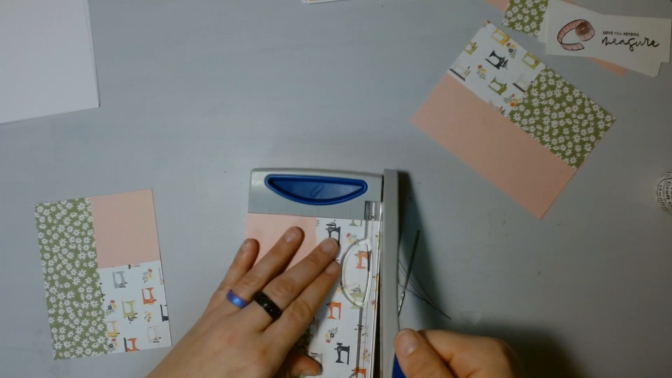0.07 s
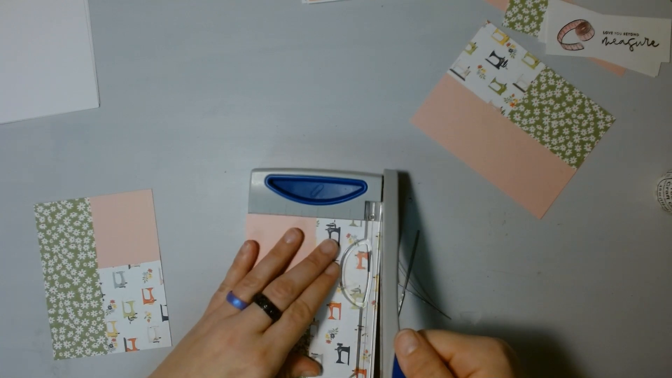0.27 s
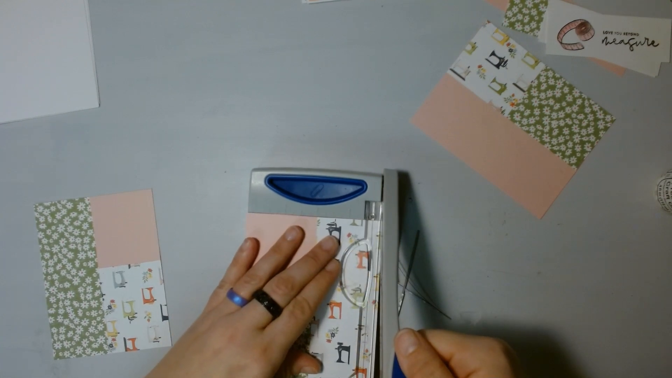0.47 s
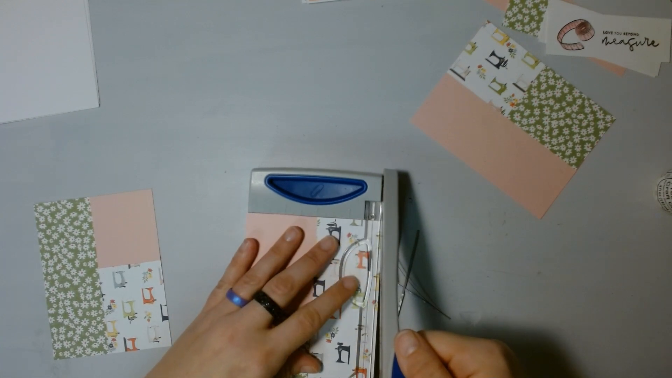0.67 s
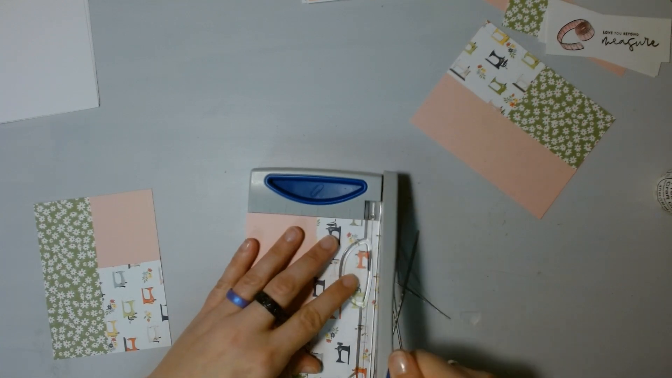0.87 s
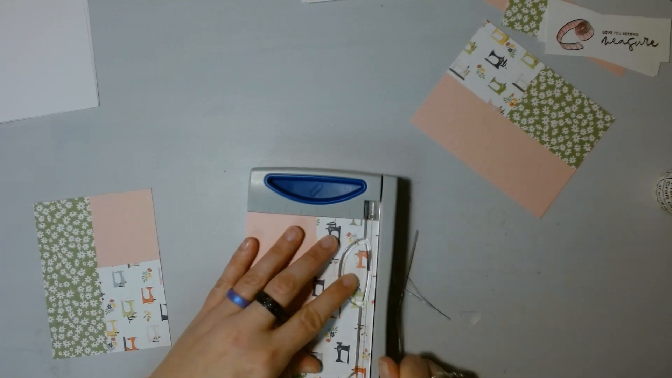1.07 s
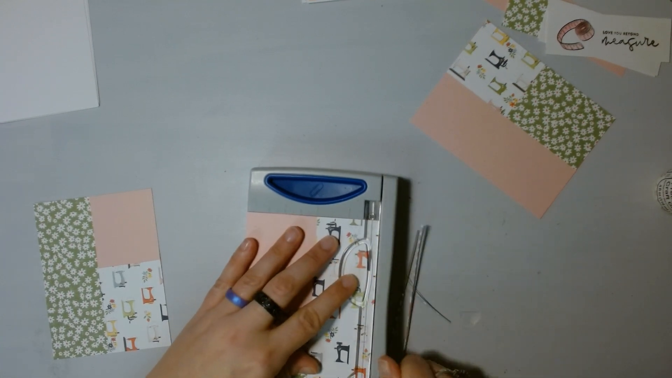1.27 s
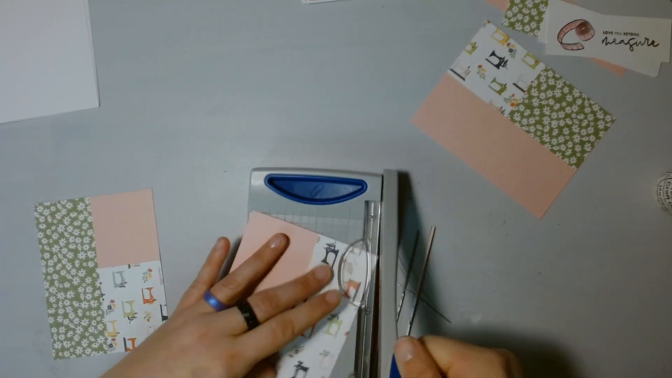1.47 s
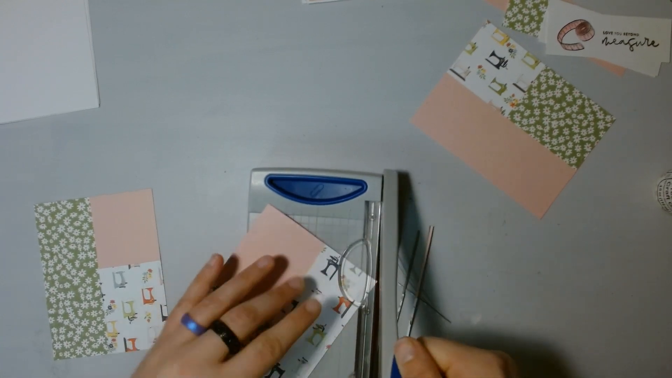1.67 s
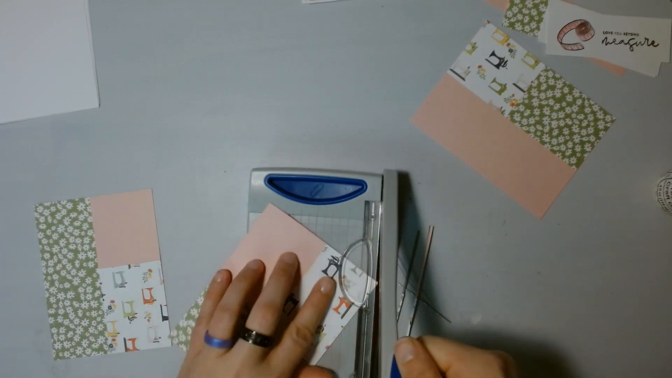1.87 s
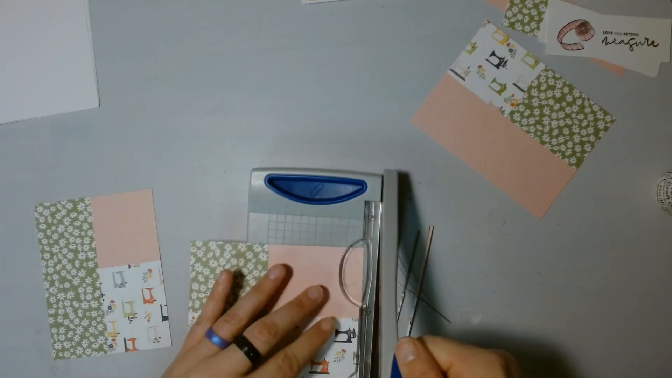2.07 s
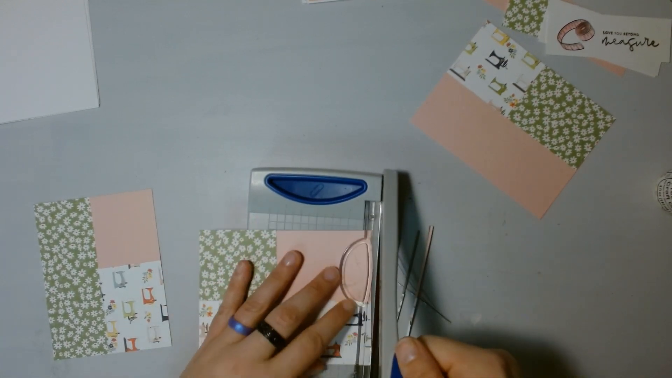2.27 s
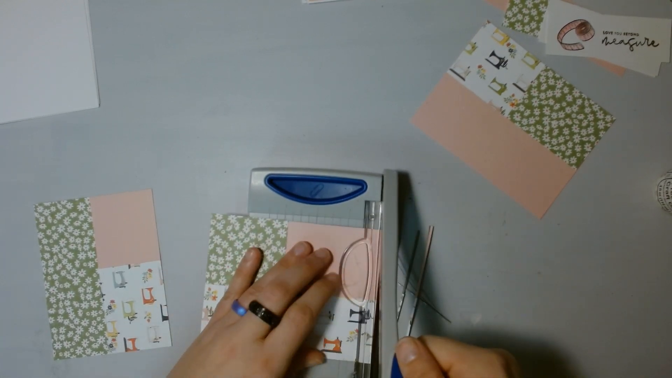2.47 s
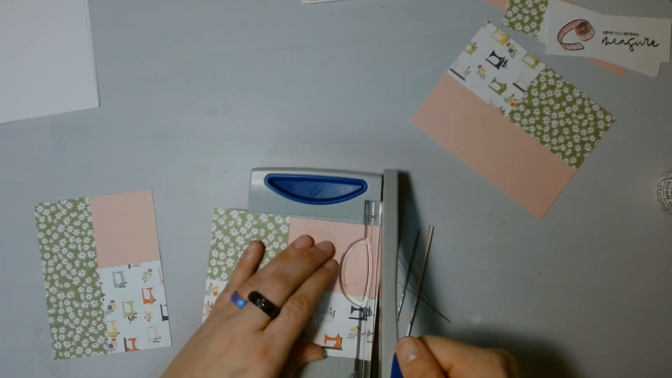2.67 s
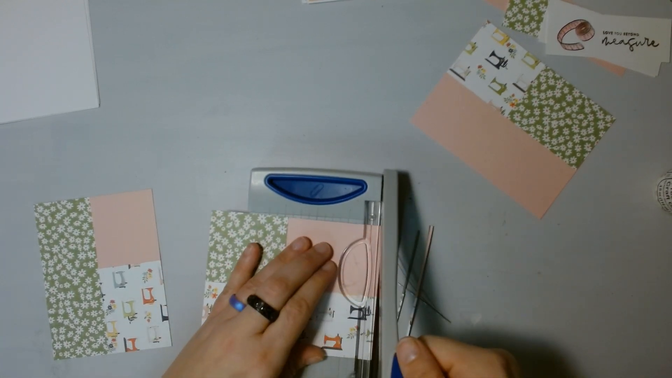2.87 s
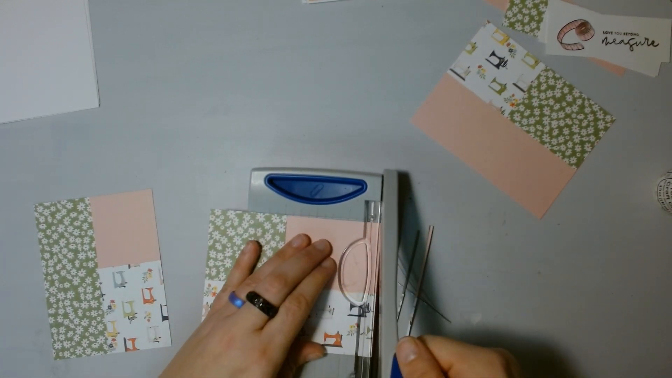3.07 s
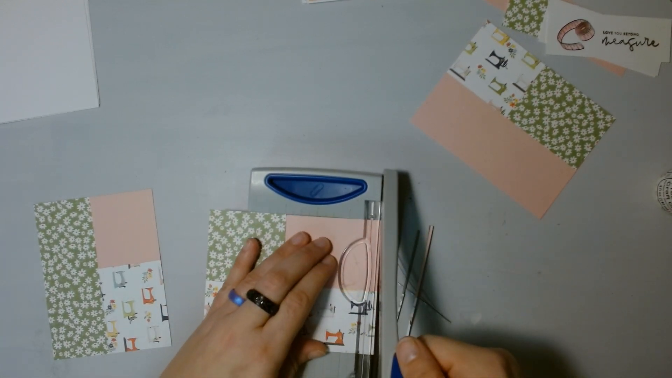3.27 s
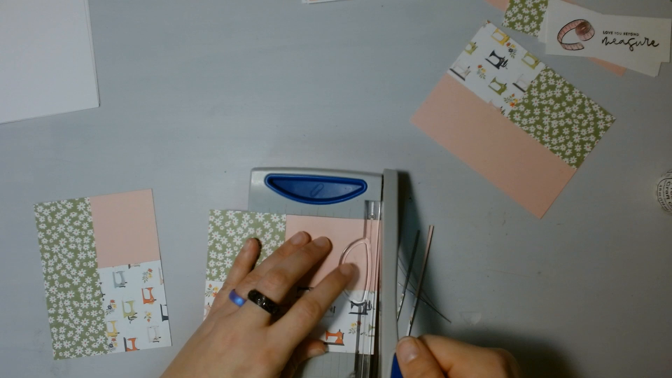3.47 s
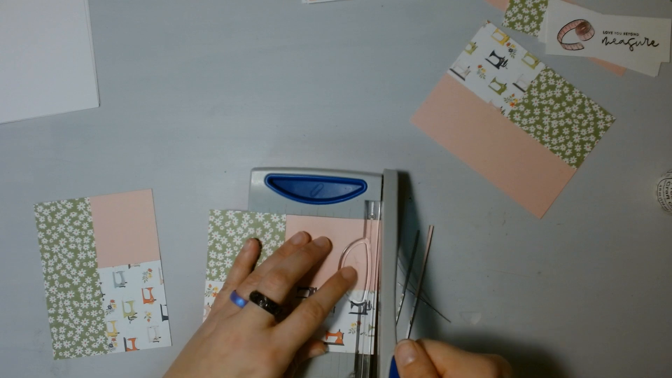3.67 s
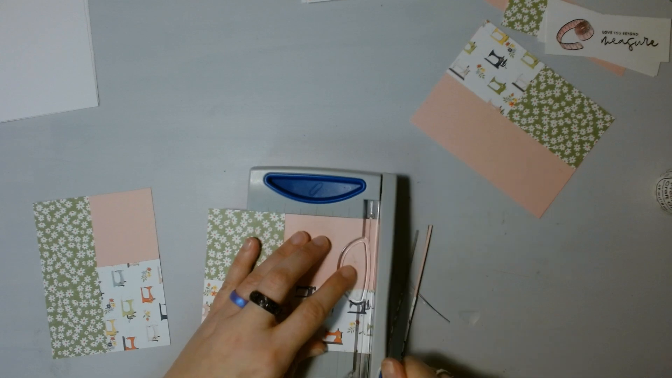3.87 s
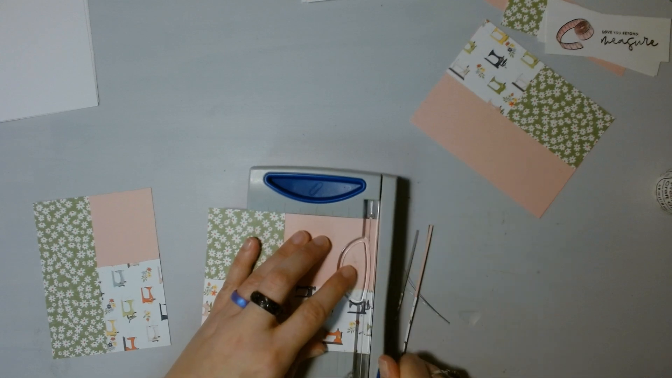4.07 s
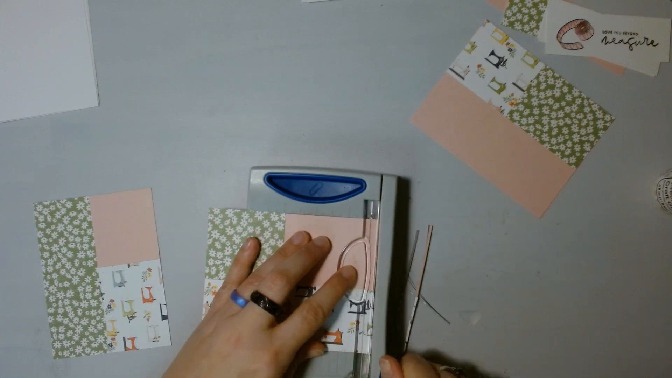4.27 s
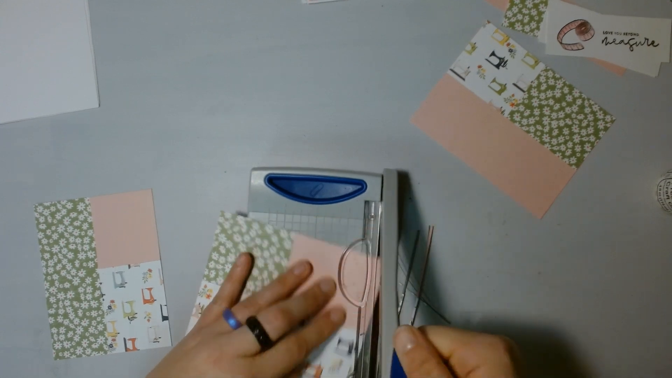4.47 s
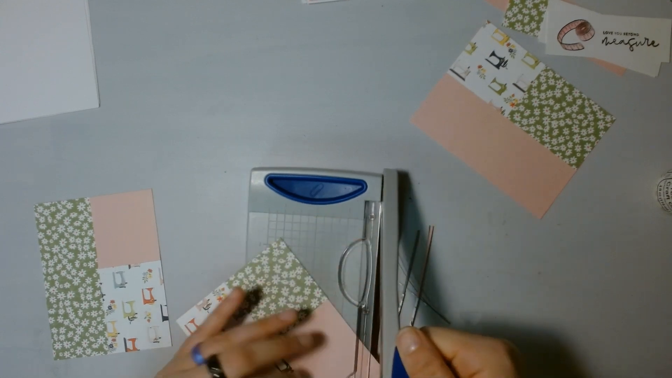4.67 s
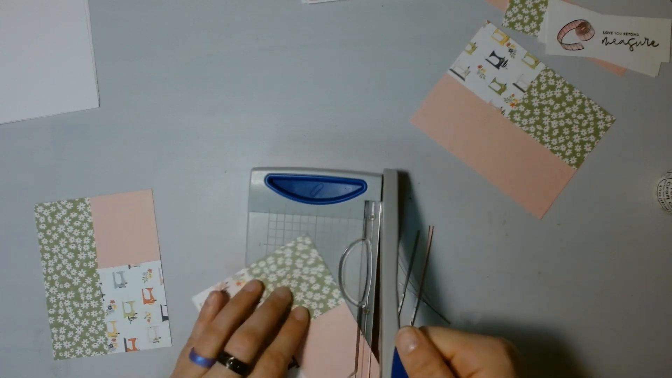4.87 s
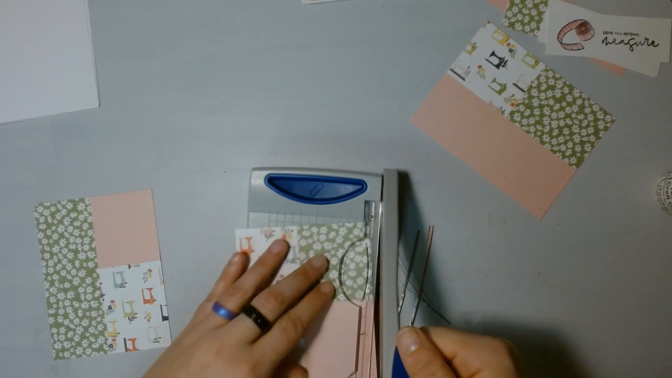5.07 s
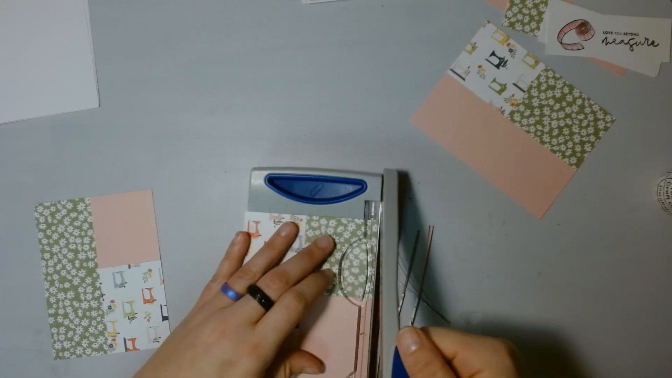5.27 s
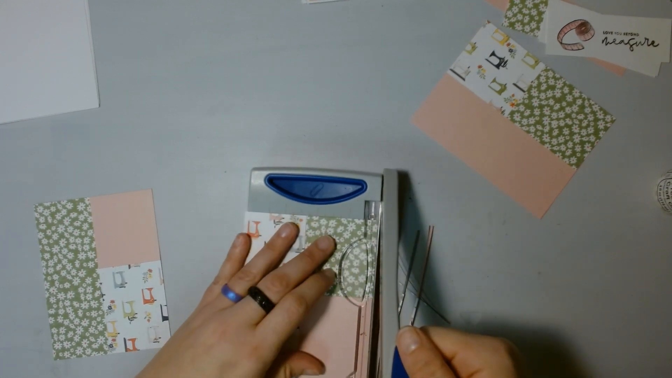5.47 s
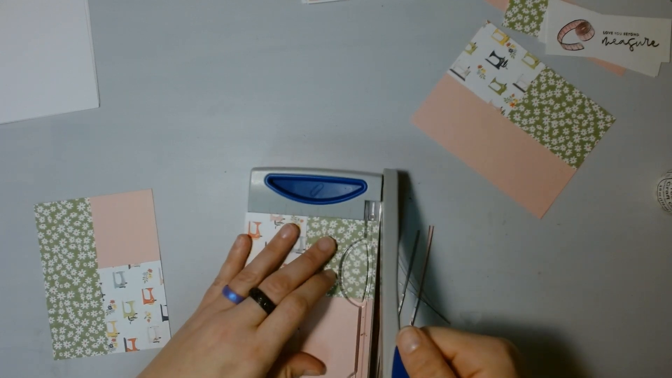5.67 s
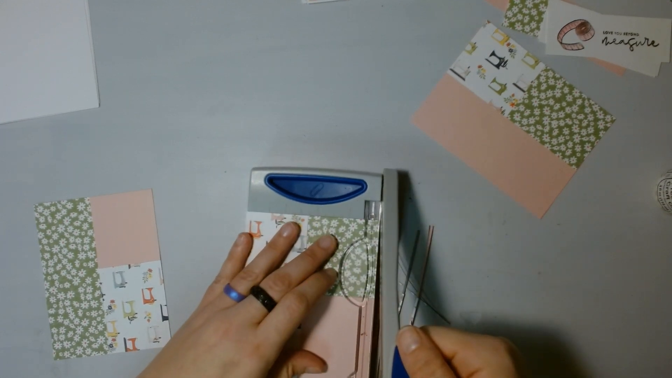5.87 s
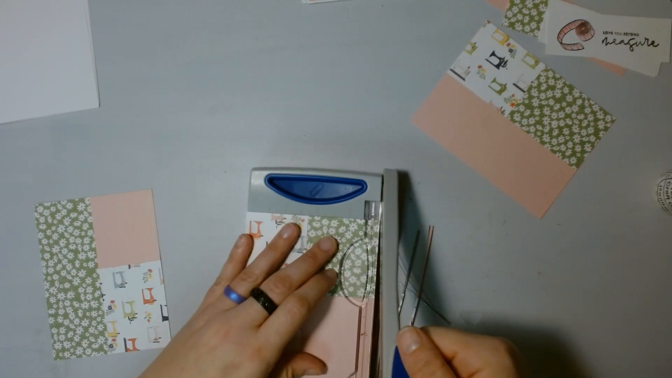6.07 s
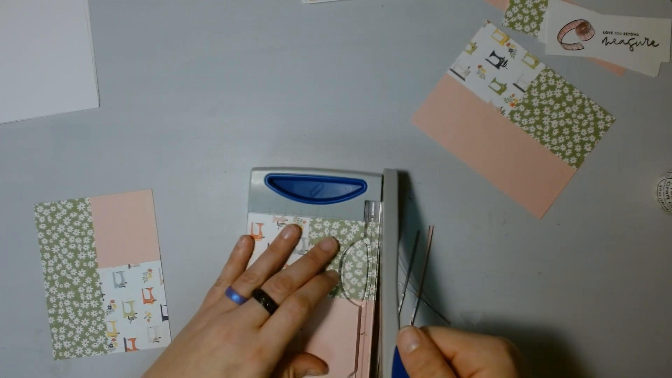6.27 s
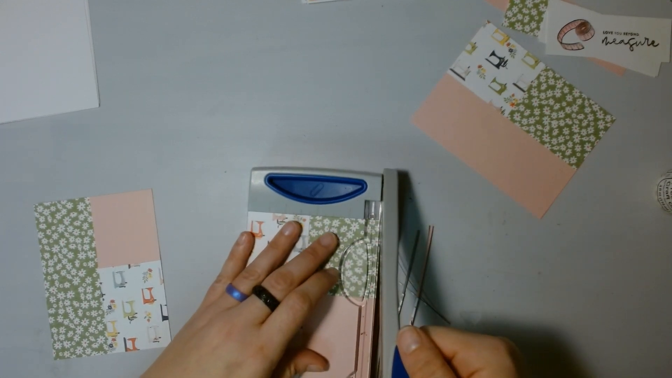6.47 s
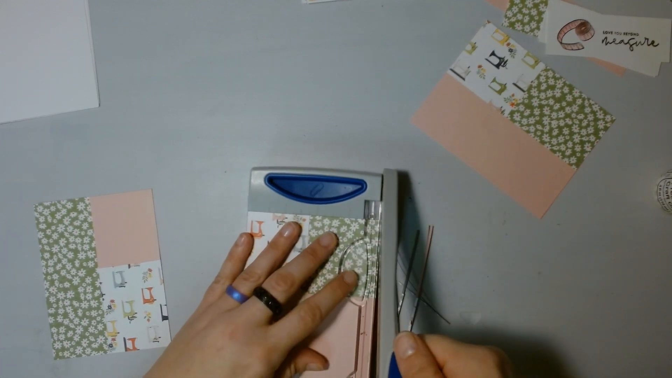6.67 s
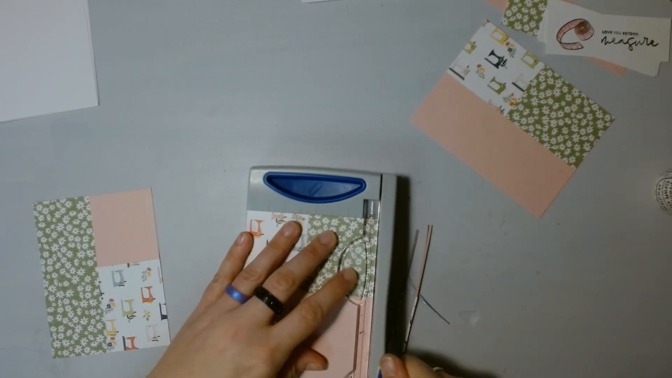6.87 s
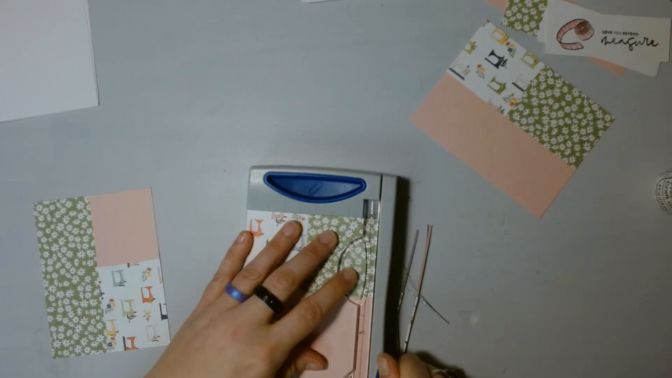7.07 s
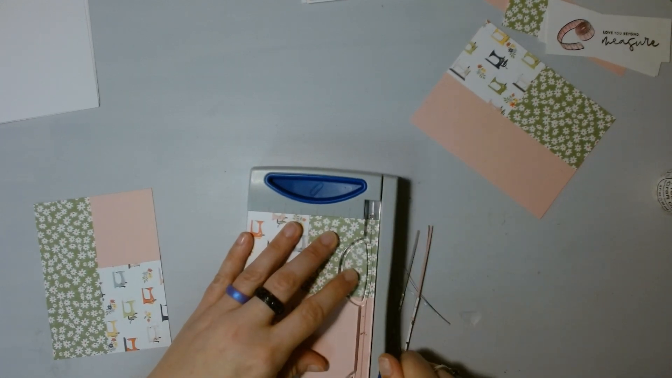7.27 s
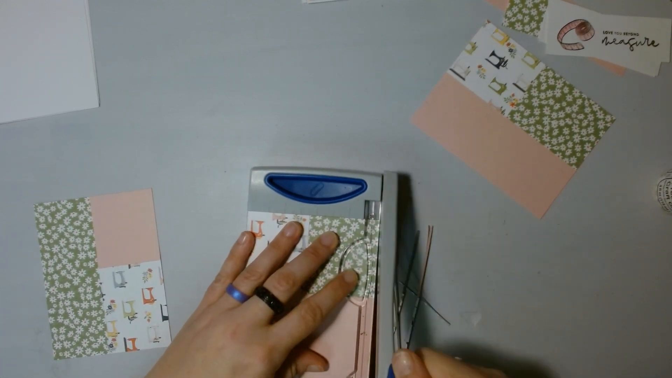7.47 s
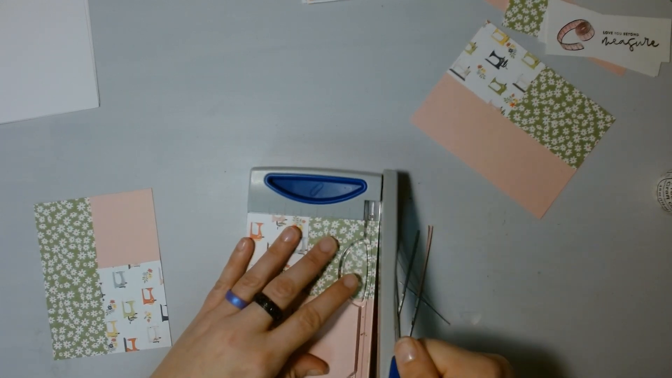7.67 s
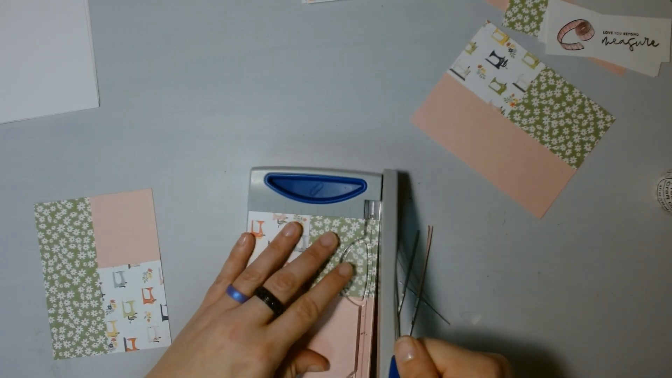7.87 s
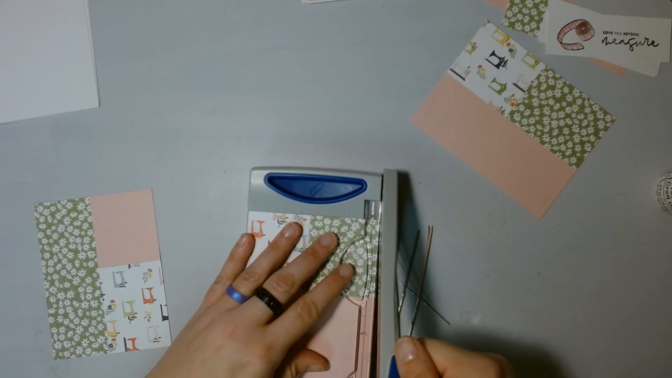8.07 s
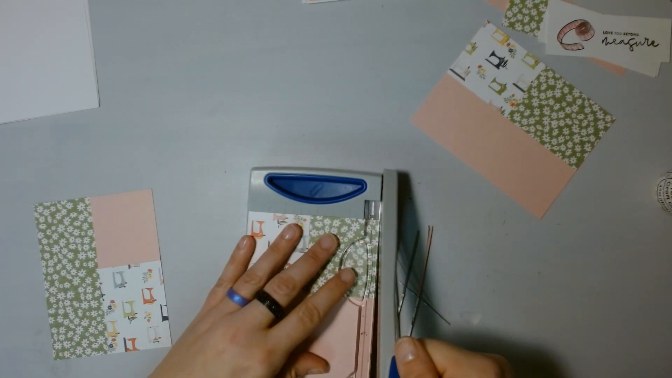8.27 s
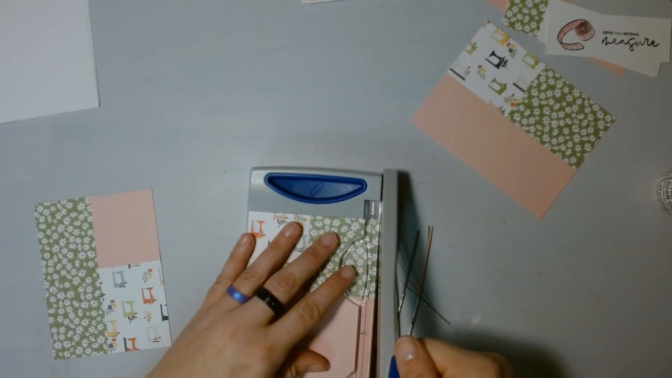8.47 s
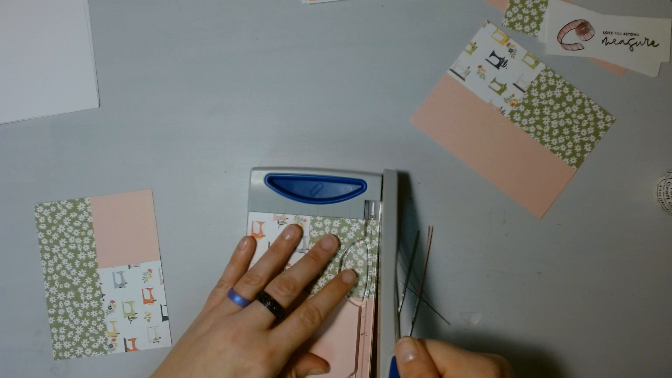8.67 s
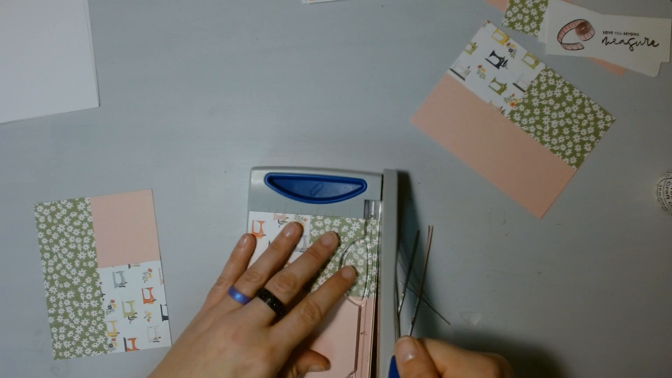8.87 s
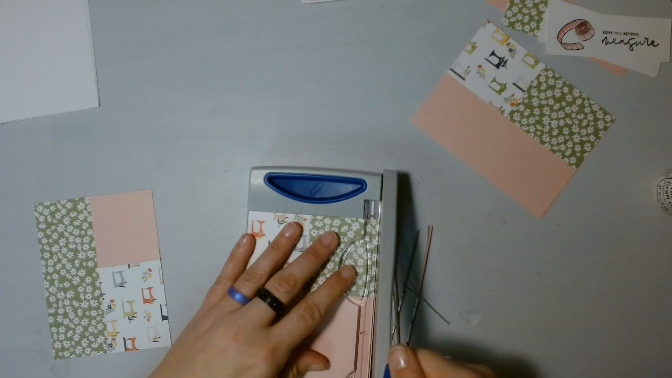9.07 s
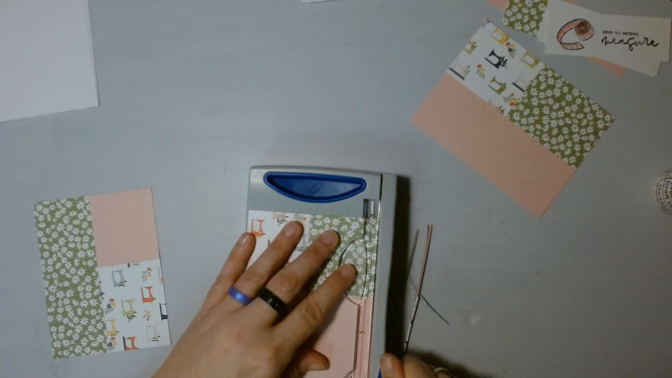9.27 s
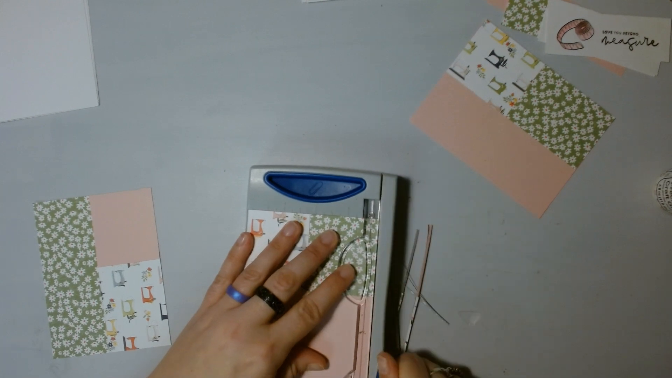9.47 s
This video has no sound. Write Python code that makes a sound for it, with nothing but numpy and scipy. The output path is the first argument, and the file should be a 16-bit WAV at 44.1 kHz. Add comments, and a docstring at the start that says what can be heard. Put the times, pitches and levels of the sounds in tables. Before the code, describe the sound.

A small paper guillotine on a table, heard close from overhead in a small damped room. Four gritty, crisp shearing strokes, about three seconds apart, each end in a loud clack with a low table thud and faint metallic ring. Between cuts, card hisses over plastic, turns, and its edges tick and bump softly. Quiet hum and hiss lie beneath, and the slams overload the mono microphone.

```python
"""A small guillotine trimmer cuts card four times: tearing-fibre noise drives steel, plastic and table modes,
stalls at times, and ends in a slam of noise and table thuds, with a faint ring of the blade's modes.
Between cuts a hand slides, turns and taps the card: swelling friction hiss, rung ticks and soft bumps.
A small damped room adds a decaying noise tail, over a quiet hum, rumble and hiss. The mono microphone
overhead clips on the slams."""
import sys
import numpy as np
from scipy import signal
from scipy.fft import rfft, irfft, next_fast_len
from scipy.io import wavfile
from scipy.ndimage import uniform_filter1d, map_coordinates

SR = 44100
rng = np.random.default_rng(int(sys.argv[2]) if len(sys.argv) > 2 else 0)


def transcribe(u):
    """Save the signal u as a 16-bit wav file named by the first command-line argument.

    u: samples, shape (n,) or (channels, n), limited to [-1, 1]; the rate is SR.
    q: integer samples, one column per channel.
    """
    v = np.clip(np.atleast_2d(u).T, -1, 1)
    q = np.round(v * 32767).astype(np.int16)
    wavfile.write(sys.argv[1], SR, q)


N = 420273  # length in samples


def amp(db):
    """Decibel law: level to amplitude ratio."""
    return 10 ** (np.asarray(db) / 20)


def unit(x):
    """Normalization to unit rms."""
    return x / np.sqrt(np.mean(x ** 2) + 1e-20)


def peak(x):
    """Normalization to unit peak."""
    return x / np.abs(x).max()


def along(points, hz):
    """Interpolation of (pitch_hz, value) points on a logarithmic frequency axis."""
    f, v = np.transpose(points)
    return np.interp(np.log(hz + 1), np.log(f + 1), v)


def smooth(x):
    """Moving average over 2 ms: rounds the corners of gain curves."""
    return np.abs(uniform_filter1d(x, size=88, axis=-1))


def wobble(rate):
    """Band-limited random modulation: a smooth curve through `rate` random knots a second."""
    knots = rng.standard_normal(int(N * rate / SR) + 4)
    return map_coordinates(knots, [np.arange(N) * rate / SR])


def filtered(x, response):
    """Linear filtering: the spectrum of x times a complex response of frequency."""
    m = next_fast_len(len(x) + SR // 2)  # padding leaves room for the ringing
    return irfft(rfft(x, m) * response(np.fft.rfftfreq(m, 1 / SR)), m)[:len(x)]


def coloured(x, spectrum):
    """Spectral shaping: x takes on a spectrum's relative levels, at unit rms."""
    return unit(filtered(x, lambda hz: amp(along(spectrum, hz))))


def modes(table):
    """Modal superposition: causal (pitch_hz, width_hz, level_db) resonances, summed with alternate signs."""
    def response(f):
        total = 0
        for k, (centre, width, db) in enumerate(table):
            band = 1j * f * width
            total = total + (-1) ** k * amp(db) * band / (centre * centre - f * f + band)
        return total
    return response


def widths(table):
    """Reciprocity of decay and bandwidth: (pitch_hz, level_db, t60_s) modes as resonances starting at those levels."""
    return [(hz, np.log(1000) / np.pi / t60, db + 20 * np.log10(t60)) for hz, db, t60 in table]


def fibres(spiky_db, clumpy_db, rate):
    """Impulsive fracture noise: fibres snap with long-tailed sizes and in clumps."""
    sizes_db = spiky_db * np.minimum(rng.exponential(size=N), 6)
    return unit(rng.standard_normal(N) * amp(sizes_db + clumpy_db * wobble(rate)))


def patchy(x, depth_db):
    """Time-frequency modulation: random gain in patches some 700 Hz by 20 ms shifts the colour."""
    z = signal.stft(x, nperseg=256)[2]
    field = uniform_filter1d(rng.standard_normal(z.shape), size=4, axis=0)
    field = uniform_filter1d(field, size=7, axis=1)
    return unit(signal.istft(z * amp(depth_db * unit(field)), nperseg=256)[1][:N])


def add(track, s, sound):
    """Superposition: mixes a sound in at time s."""
    part = track[round(s * SR):][:len(sound)]
    part += sound[:len(part)]


SWELL_DB, DULL_GROWS = 22, 0.72  # depth of attack and release; fraction of it taken by the dull part


def swells(rows):
    """Envelope shaping: hiss and dull gains of attack-hold-release gestures."""
    t, gains = np.arange(N) / SR, np.zeros((2, N))
    for s, attack, hold, release, db, dull_db in rows:
        a, b = round(s * SR), round((s + attack + hold + release) * SR)
        corners = s + np.cumsum([0, attack, hold, release])
        dip_db = SWELL_DB * np.interp(t[a:b], corners, [1, 0, 0, 1])
        gains[:, a:b] += amp([db - dip_db, db + dull_db - DULL_GROWS * dip_db])
    return smooth(gains)


# hands settling on the table after a slam: starting level_db, fall_db_per_s
SETTLE = [(-45, 50), (-63, 6)]
LEAN_DB, LEAN_GROWS = -55, 0.45  # level while card slides at -49.5 dB; exponent of growth with the hiss


def leaning():
    """Contact loading: how hard the hands stir the table after slams and during slides."""
    t, after = np.arange(N) / SR, 0
    for s, *_ in SLAMS:
        for db, fall_db in SETTLE:
            after = after + amp(db - fall_db * np.abs(t - s)) * (t > s)
    return after + amp(LEAN_DB) * (swells(SLIDES)[0] / amp(-49.5)) ** LEAN_GROWS


# microphone hiss spectrum: pitch_hz, relative level_db per Hz
FLOOR = [(180, -32.5), (300, -1), (603, -3.5), (870, -4), (1150, -6.5), (1460, -7.5), (2980, -7),
         (16000, -12)]
# house rumble spectrum: pitch_hz, relative level_db per Hz
RUMBLE = [(10, -20), (25, 1.5), (62, 1.5), (100, -9.5), (160, -10.5), (220, -13), (320, -32.5),
          (500, -36.5), (900, -70.5)]
# faint hum: pitch_hz, level_db (before a 1.5 dB lift and a slow wobble)
HUM = [(247, -73.5), (156, -82), (3074, -87.5)]
FLOOR_DB, RUMBLE_DB = -67, -58.5  # rms levels


def background():
    """Stationary noise and tones: microphone hiss, low rumble of house and hands, and an unsteady hum."""
    t, hum = np.arange(N) / SR, 0
    for hz, db in HUM:
        level = amp(db + 1.5 + 0.96 * wobble(5.3))
        hum = hum + level * np.sin(2 * np.pi * hz * t + 0.37 * wobble(4.4))
    rumble = amp(RUMBLE_DB) * coloured(rng.standard_normal(N), RUMBLE)
    hands = filtered(fibres(spiky_db=2.0, clumpy_db=5.0, rate=14), modes(widths(TABLE[1:])))
    hiss = amp(FLOOR_DB) * coloured(rng.standard_normal(N), FLOOR)
    return hiss + rumble + leaning() * unit(hands) + hum


# reverberation: pitch_hz, t60_s
ROOM = [(100, 0.35), (600, 0.24), (4000, 0.15), (12000, 0.13)]


def room(x, share_db):
    """Reverberant decay: convolution with a noise tail, each frequency dying at its own speed."""
    out, size = np.zeros(N), SR // 3
    # the deep thuds reach the microphone through its stand and hardly stir the room
    airborne = filtered(x, lambda hz: 1j * hz / (1j * hz + 350))
    for start in range(0, N, size):  # a new tail every third of a second
        hz, t, z = signal.stft(rng.standard_normal(SR // 2), SR, nperseg=256)
        decay = amp(-60 * t / along(ROOM, hz)[:, None])
        tail = signal.istft(z * decay, SR, nperseg=256)[1]
        echo = signal.fftconvolve(airborne[start:start + size], tail / np.linalg.norm(tail))
        add(out, start / SR + .003, echo)
    return x + amp(share_db) * out


# card sliding on plastic: start_s, attack_s, hold_s, release_s, hiss level_db, dull part re hiss_db
SLIDES = [(1.0, 0.042, .08, 0.054, -62, 0.5), (1.19, 0.0091, .21, .06, -54.5, -9),
          (1.638, .004, 0.0042, 0.079, -49.5, 3), (1.62, .1, 0.096, 0.049, -49, -13),
          (1.86, 0.025, .005, 0.041, -57.5, -3), (2.0, 0.0028, .005, 0.14, -47.5, -10.5),
          (2.15, .02, 0.043, 0.19, -61.5, -12.5), (2.25, 0.11, .03, 0.066, -62.5, -5.5),
          (2.87, .03, .06, 0.095, -70, -8), (3.95, 0.026, 0.22, 0.025, -62.5, -2.5),
          (4.2, 0.13, .07, 0.068, -44, -14), (4.655, 0.0085, 0.009, 0.085, -56, -1.5),
          (4.65, .05, .1, 0.057, -58, -16), (4.8, 0.051, 0.045, .2, -54.5, -7.5),
          (5.0, 0.033, 0.099, 0.16, -68.5, -0.5), (6.12, 0.0097, 0.032, .06, -71, -0.5),
          (6.345, 0.0053, .02, 0.038, -67, -4), (7.13, 0.074, 0.064, .03, -67.5, -6),
          (7.42, .02, .06, .05, -74, -3), (9.26, .02, .06, .08, -65, -1),
          (9.38, 0.013, 0.13, 0.023, -55.5, -3.5)]
# sliding hiss spectrum: pitch_hz, relative level_db per Hz
CARD = [(880, -46), (1500, -24), (1850, -9), (2160, -11), (4730, 2), (6690, -3), (8000, -1), (9370, -14),
        (16000, -22)]
# the arm scrapes past the edge as it is raised: the same columns as SLIDES
LIFTS = [(1.126, 0.0097, 0.0077, 0.032, -29, -15), (4.083, .008, 0.044, 0.041, -24, -23.5)]
# edge hiss spectrum: pitch_hz, relative level_db per Hz
EDGE = [(880, -78), (1500, -11), (1900, -16.5), (4420, 3.5), (7100, -1), (9850, -14.5), (16000, -28)]


def rubbing(rows, spectrum, clumpy_db):
    """Friction noise: a fine bright hiss over a duller scrape."""
    hiss, dull = swells(rows)
    fine = coloured(fibres(spiky_db=3.0, clumpy_db=clumpy_db, rate=24), spectrum)
    fine = patchy(fine, depth_db=2.5)
    low_spectrum = [(120, -22), (300, 5), (800, -0.5), (1800, -3.5), (4000, -18)]  # Hz, dB
    scrape = coloured(fibres(spiky_db=1.5, clumpy_db=3.5, rate=64), low_spectrum)
    return hiss * fine + dull * scrape


# table modes: pitch_hz, level_db, t60_s
TABLE = [(30.75, -13, 1.1), (49, -5, .12), (65, -8.5, 0.25), (87.4, -1.5, 0.22), (119, -7.5, 0.13),
         (146, -2.5, 0.13), (229, -7.5, 0.089), (291, -13.5, 0.11), (415, -13, 0.077), (544.2, -13, 0.055)]


def bump(favoured_hz):
    """Impulse response of the table: a soft palm favours the low modes, a fingertip the high."""
    t = np.arange(SR) / SR
    ring = 0
    for hz, db, t60 in TABLE:
        level = amp(db + rng.normal(0, 1.3) - 60 * t / t60)
        mismatch = (hz / favoured_hz) ** 2 + (favoured_hz / hz) ** 2
        ring = ring + level * np.sin(2 * np.pi * hz * t) / mismatch
    onset = 1 - np.exp(-t / 0.001)
    # the stand passes little of the slowest sway
    return peak(filtered(ring * onset, lambda hz: (1j * hz / (1j * hz + 16)) ** 2))


# a palm, a finger or the base bumping the table: start_s, peak level_db, favoured pitch_hz
BUMPS = [(0.675, -32, 109), (1.436, -38, 197), (1.449, -31.5, 140), (1.15, -40, 298), (1.646, -18.5, 124),
         (1.997, -39, 108), (2.388, -44, 131), (2.925, -46, 100), (3.369, -48.5, 149), (4.055, -48, 350),
         (4.13, -39, 180), (4.18, -45, 280), (4.302, -33, 150), (4.429, -44.5, 300), (4.547, -42.5, 405.4),
         (4.618, -47, 300), (4.657, -25.5, 107), (4.686, -28, 269), (5.106, -37, 130.7),
         (5.548, -46, 179.3), (6.35, -44, 200.2), (7.301, -38, 205), (9.46, -39.5, 120)]


def bumps():
    """Soft impact: each push sets the table's modes ringing."""
    out = np.zeros(N)
    for s, db, hz in BUMPS:
        add(out, s, amp(db) * bump(hz))
    return out


# card edges and nails ticking: start_s, ring peak level_db, pitch_hz, body re ring peak_db
TICKS = [(0.6733, -17, 3450, -29), (1.1992, -36, 4600, -26), (1.2145, -25.5, 4180, -27),
         (1.419, -41, 4800, -4), (1.6427, -28, 4120, -17), (1.719, -37, 5010, -23),
         (1.8746, -43, 1800, -11), (1.9847, -49, 1040, -1), (2.0045, -27.5, 4400, -30),
         (2.3894, -50.5, 3720, 1), (2.7047, -47.5, 1810, -23), (2.7288, -40.5, 5150, -23),
         (2.929, -58, 4200, 4), (3.5813, -47, 1000, 0), (4.2175, -41, 4500, -6), (4.3042, -32, 5270, -5.5),
         (4.6892, -35, 3920, -33), (4.8548, -31.5, 4360, -26.5), (4.997, -38.5, 1800, -16),
         (5.0116, -29, 1785, -14.5), (5.5514, -33, 1830, -21.5), (6.125, -55.5, 1800, 5),
         (6.347, -55.5, 3000, 4), (6.5521, -32, 1780, -12.5), (6.572, -34.5, 5380, 0),
         (7.04, -55, 4500, -15), (7.297, -31.5, 1590, -30), (7.4294, -52, 3790, -3),
         (7.6357, -49.5, 1774, -4), (8.6754, -47.5, 1470, -2.5), (9.405, -33, 4600, -8.5),
         (9.4355, -27.5, 5200, -19), (9.4646, -43.5, 1440, 2.5), (9.5107, -27.5, 4300, -17.5)]
# the rising arm snags on the edge, with more treble than a tick: the same columns
SNAGS = [(1.1375, -21, 6300, -40), (4.0861, -26, 5250, -34), (4.1013, -27, 4600, -32),
         (4.117, -18, 6500, -28), (4.1289, -15, 6600, -20.5), (4.153, -37, 5000, -20)]
# plastic deck modes: pitch_hz, width_hz, level_db (before weighting towards each tick's pitch)
DECK = [(831, 430, -3), (1230, 80, -4.5), (1780, 110, 2.5), (2800, 660, -1), (3969, 680, 5), (5043, 470, 7),
        (6740, 1300, 2)]
TICK_TREBLE_DB, SNAG_TREBLE_DB = -19, -11  # re ring peak


def ticks():
    """Impulsive excitation: a short puff rings the deck, most near its own pitch, with body and treble."""
    out, t = np.zeros(N), np.arange(SR // 5) / SR
    rows = [(*row, TICK_TREBLE_DB) for row in TICKS] + [(*row, SNAG_TREBLE_DB) for row in SNAGS]
    for s, db, hz, body_db, treble_db in rows:
        puff = rng.standard_normal((4, len(t))) * (amp(-60 * t / 0.057) + amp(1.5 - 60 * t / 0.005))
        deck = [(c, w, level - 3.5 * abs(np.log2(c / hz)) + 2 * rng.normal()) for c, w, level in DECK]
        soft = lambda f: modes(deck)(f) / (1 + 1j * f / 7000) ** 2
        # low modes of the plastic ring longer and clearer than high ones
        tone = filtered(puff[3] * amp(-60 * t / 0.022), modes([(hz, hz * hz / 30000, 0)]))
        ring = peak(filtered(puff[0], soft)) + 1200 / hz * peak(tone)
        body = filtered(puff[1], modes([(444.2, 200, -0.5), (827, 300, 0)]))
        treble = filtered(puff[2], modes([(7900, 6800, 24), (12500, 4100, -29)]))
        tick = peak(ring) + amp(body_db) * peak(body) + amp(treble_db) * peak(treble)
        add(out, s, amp(db) * tick)
    return out


# free blade modes: pitch_hz, level_db, t60_s, tip_db gained when the tip is struck
BLADE = [(1408, -7, .8, -2), (2353, -11, .5, 1.5), (3658, -6, .65, -4.5), (4438, 1.5, .52, 1.5),
         (4922, -1, .7, 3)]
STILLED_DB, STILL_S = 1, .01  # ring lost to the hand, and how fast


def blade():
    """Free modal vibration: weighted by the point struck, the ring decays and the hand damps it slightly."""
    out, t = np.zeros(N), np.arange(SR) / SR
    for s, _, _, ring_db, _, place, stilled in SLAMS:
        ring = 0
        for hz, db, t60, tip_db in BLADE:
            ring = ring + amp(db + place * tip_db - 60 * t / t60) * np.sin(2 * np.pi * hz * t)
        hand_db = STILLED_DB * np.clip((s + t - stilled) / STILL_S, 0, 1)
        add(out, s, amp(ring_db - hand_db) * ring)
    return out


# slams: start_s, crack level_db, thud level_db (first push), blade ring level_db, rattle t60_s,
# contact place (heel negative, tip positive), stilled_s when the hand touches the blade
SLAMS = [(0.9371, -3.5, -10, -51, 0.026, -1.44, 1.5), (3.8666, -1.5, -7, -46, 0.031, 0.94, 4.3),
         (6.794, -4.5, -10.5, -50.5, 0.023, 1, 7.04), (9.1596, -3, -11, -47.5, 0.031, -1.2, 9.39)]
# crack spectrum: pitch_hz, relative level_db per Hz
CRACK = [(150, -28.5), (250, -2.5), (367, -8.5), (1220, -10.5), (1530, -7.5), (2240, -11.5), (2570, -3.5),
         (3520, -10.5), (4050, -9.5), (4490, 0.5), (6700, -11.5), (8550, -18.5), (16000, -31)]


def slams():
    """Impact: the handle loads the table, then steel meets the stop and pushes it again, rattles and bounces."""
    out, t = np.zeros(N), np.arange(SR) / SR
    for s, crack_db, thud_db, _, t60, *_ in SLAMS:
        add(out, s - .0105, -amp(thud_db) * bump(favoured_hz=116))
        add(out, s - .0003, -amp(thud_db + 3.5) * bump(favoured_hz=170))
        rattle = coloured(rng.standard_normal(len(t)), CRACK) * amp(1.2 * wobble(300)[:len(t)])
        blow = amp(-60 * np.maximum(t - .004, 0) / t60) + amp(-2 - 60 * t / 0.0025)
        bounce = amp(-11.5 - 60 * (t - .0115) / t60) * (t > .0115)
        add(out, s, amp(crack_db) * (blow + bounce) * rattle)
    return out


# strokes of the arm, each ending in its slam: start_s, first hiss level_db, full bite at_s,
# full hiss level_db, last hiss level_db
STROKES = [(0.68, -48.5, 0.82, -20, -23), (3.583, -51.5, 3.70, -23, -21), (6.568, -45.5, 6.67, -23, -26.5),
           (8.885, -56.5, 9.0, -23, -21)]
# the arm hesitates, then bites again at once: start_s, length_s, depth_db
STALLS = [(0.872, 0.027, 9.5), (3.761, .075, 38), (9.056, .034, 17.5)]
FULL_DB, NEAR_STOP_S = -21, .05  # a typical full bite; how early the stop makes itself felt
# re full bite: level_db, growth with the hiss (dB per dB), stop_db gained near the stop
HUM_LAW, SHAKE_LAW, SQUEAL_LAW = (0, .85, -10), (-9, .55, 14), (-11, 1.05, 5)
STALL_FALL_S, REBITE_S = 0.037, .008  # longest time to sink to full depth; time to bite again
RISE_SHAPE = .75  # under 1: the bite builds fast at first
STRAIN_S, STRAIN_DB = .025, 5  # the blade squeals louder just before it stalls


def bite():
    """Load-dependent excitation: hiss, hum, shake and squeal build, hold to the slam and sag in stalls."""
    t, gains, sag_db, strain_db = np.arange(N) / SR, 0, 0, 0
    for s, length, depth_db in STALLS:
        corners = [s, s + min(STALL_FALL_S, .6 * length), s + length - REBITE_S, s + length]
        sag_db = sag_db + np.interp(t, corners, [0, depth_db, depth_db, 0])
        strain_db = strain_db + STRAIN_DB * np.exp(-np.abs(s - t) / STRAIN_S) * (t < s)
    for (start, first_db, full, full_db, last_db), (slam, *_) in zip(STROKES, SLAMS):
        rise = np.clip((t - start) / (full - start), 0, 1) ** RISE_SHAPE
        drift_db = np.interp(t, [full, slam], [0, last_db - full_db])
        db = first_db + (full_db - first_db) * rise + drift_db - sag_db
        near = np.exp(-np.abs(slam - t) / NEAR_STOP_S)
        hum, shake, squeal = [FULL_DB + re_db + grows * (db - FULL_DB) + stop_db * near
                              for re_db, grows, stop_db in (HUM_LAW, SHAKE_LAW, SQUEAL_LAW)]
        gains = gains + amp([db, hum, shake, squeal + strain_db]) * ((t > start) & (t < slam))
    return smooth(gains)


# shearing hiss spectrum: pitch_hz, relative level_db per Hz
SHEAR = [(530, -39), (900, -6.5), (1050, -1.5), (1160, -9), (1530, -4.5), (1770, -13), (2360, -4),
         (3040, -7), (4410, -1.5), (7960, -14), (16000, -35.5)]
# arm under load: pitch_hz, width_hz, level_db
STEEL = [(1510, 34, -8.5), (2368, 130, -3), (2960, 87, -4), (3360, 200, -6.5), (3960, 120, -4),
         (4950, 170, -8.5), (5580, 200, -2.5), (6450, 210, -5.5), (7630, 240, -10.5)]
# plastic base: pitch_hz, width_hz, level_db
BASE = [(480, 56, -4.5), (571, 48, 0.5), (710, 150, -11), (953, 140, -15)]


def shearing():
    """Forced vibration: tearing fibres hiss, sing in the loaded arm, hum in the base and shake the table."""
    hiss, hum, shake, squeal = bite()
    tear = fibres(spiky_db=2.5, clumpy_db=2.0, rate=160)
    # as the contact point travels, each mode of the arm swells and fades on its own
    arm = sum(amp(5 * wobble(45)) * filtered(tear, modes([mode])) for mode in STEEL)
    edge = patchy(coloured(tear, SHEAR), depth_db=3.0) + amp(-4.5) * unit(arm)
    judder = fibres(spiky_db=2.5, clumpy_db=2.0, rate=76)

    def driven(gain, body):
        """Resonant response to the judder, scaled by its ungated rms."""
        return filtered(gain * judder, body) / np.std(filtered(judder, body))

    lurch = amp(1.5 * wobble(35))  # the tear runs unevenly
    blade_squeal = driven(squeal, modes([(4480, 66, 0)]))
    base_hum = driven(hum, modes(BASE))
    table_shake = driven(shake, modes(widths(TABLE[1:])))
    return hiss * lurch * unit(edge) + blade_squeal + base_hum + table_shake


def scene():
    """Superposition of sources: cuts and handling stir the room; blade ring and background stay dry."""
    lifting = rubbing(LIFTS, EDGE, clumpy_db=4.0)
    sliding = rubbing(SLIDES, CARD, clumpy_db=1.0)
    handling = lifting + sliding + ticks() + bumps()
    mono = room(shearing() + slams() + handling, share_db=-11) + blade() + background()
    return np.array([mono, mono])


TOP_HZ = 15800  # band limit


def record(dry):
    """Saturation and band limiting: the input clips on the slams, then a steep low-pass cuts the top."""
    clipped = dry[0] / (1 + np.abs(dry[0]) ** 8) ** (1 / 8)
    kept = filtered(clipped, lambda hz: 1 / (1 + (hz / TOP_HZ) ** 120))
    return np.array([kept, kept])


dry = scene()
out = record(dry)
transcribe(out)
```